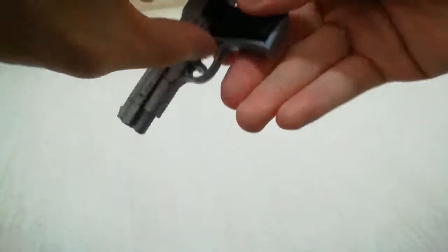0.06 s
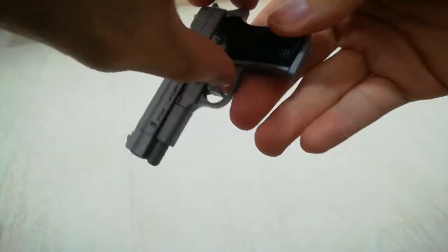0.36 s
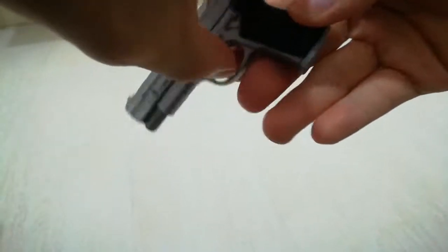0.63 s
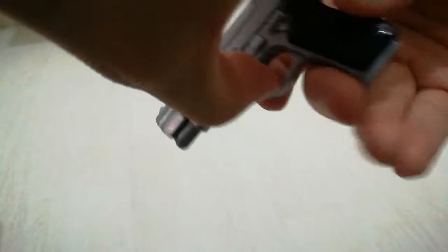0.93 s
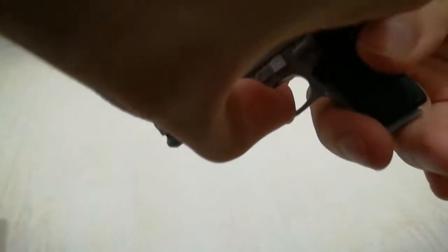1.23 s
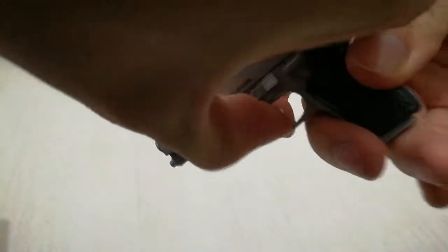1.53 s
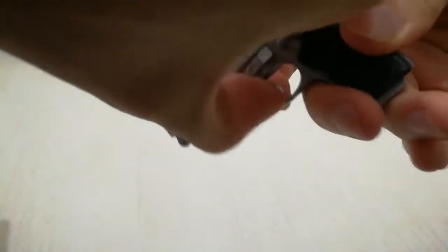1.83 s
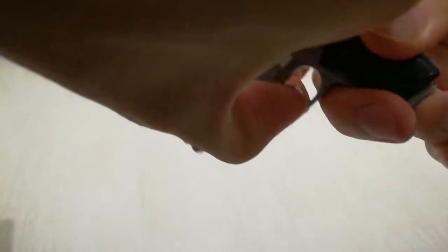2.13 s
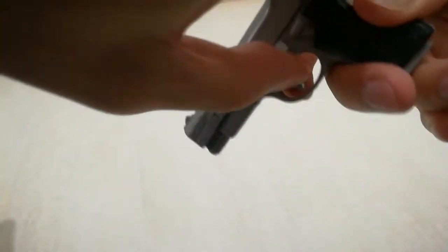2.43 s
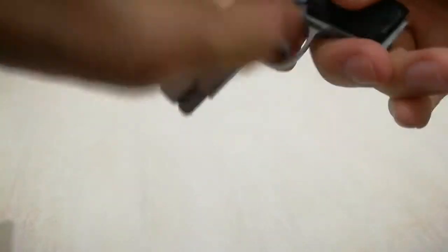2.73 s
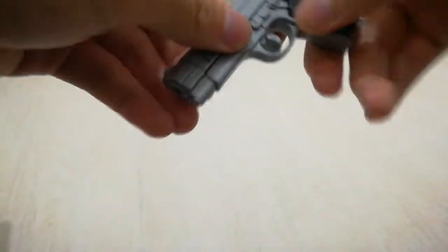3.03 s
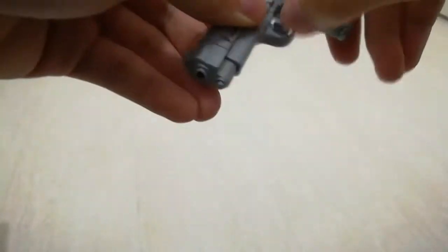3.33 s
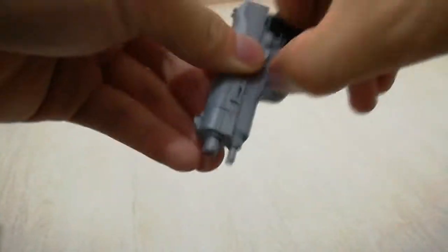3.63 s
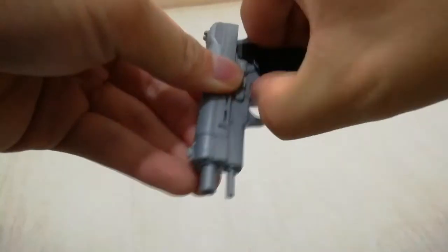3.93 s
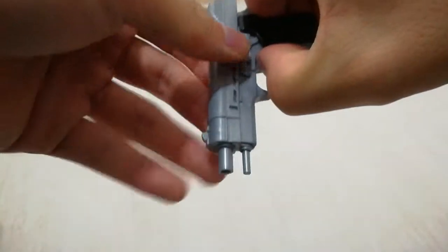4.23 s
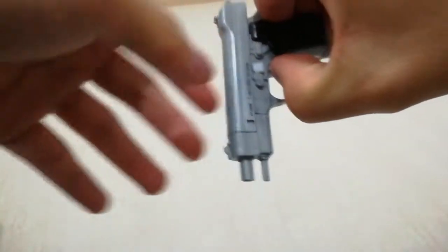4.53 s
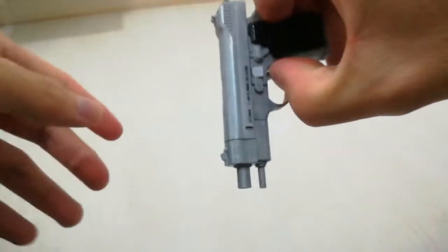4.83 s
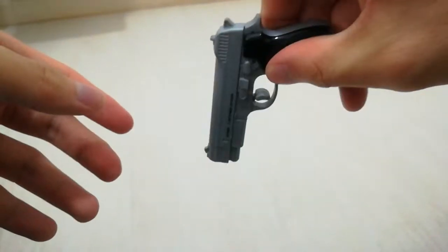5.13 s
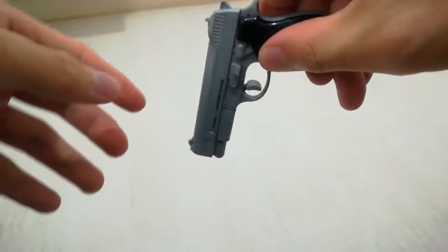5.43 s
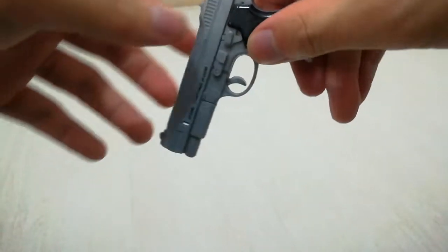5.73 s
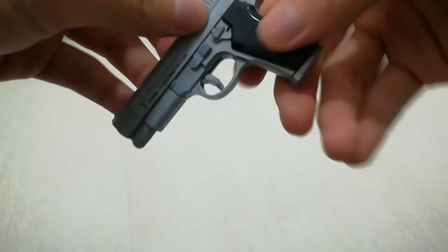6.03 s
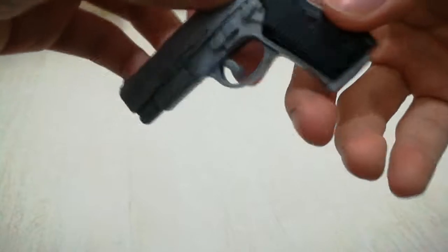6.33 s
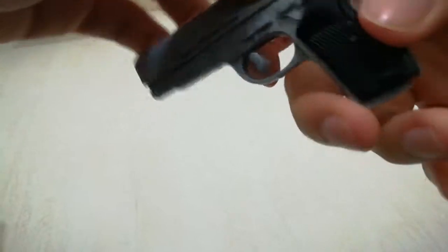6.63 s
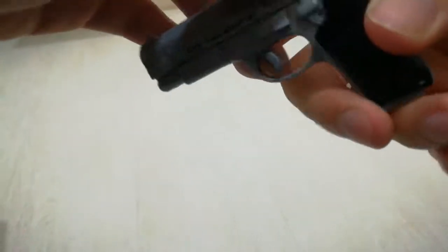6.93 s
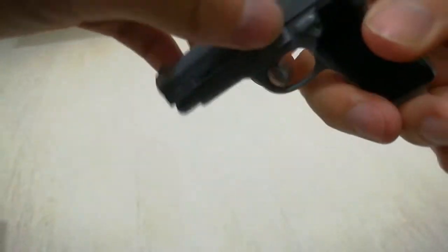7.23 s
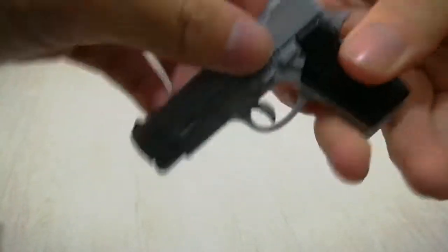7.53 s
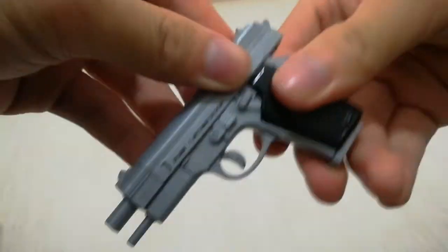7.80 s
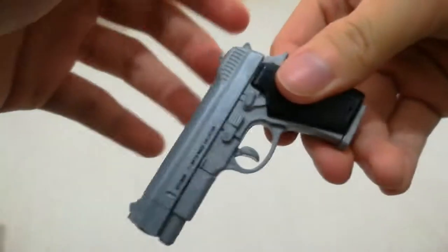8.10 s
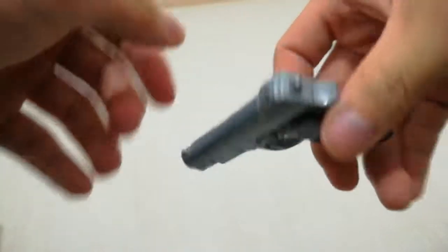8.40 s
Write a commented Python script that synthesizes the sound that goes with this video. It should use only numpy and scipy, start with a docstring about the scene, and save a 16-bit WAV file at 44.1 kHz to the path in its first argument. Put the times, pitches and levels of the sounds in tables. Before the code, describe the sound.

A small metal toy pistol is handled close to the microphone in a quiet, bare room. Loose parts tick and scrape faintly, then the magazine clicks home with a spring ping and soft thuds. The slide snaps shut with a very loud, briefly ringing crack. More light clicks follow, then a short rasp as the slide is drawn back and a second sharp snap. A faint low rumble lies underneath.

```python
"""A quiet, bare room, where hands work a small die-cast toy pistol close to the left microphone.
Loose parts tick, the magazine is pushed home with a spring ping and soft thuds, and the slide is
drawn back with a rasp and twice snaps shut, hard enough to overload the microphone. Clicks and
rasp all ring the same hand-damped casting; short reflections and a low rumble sit behind them."""
import sys
import numpy as np
from scipy import signal
from scipy.fft import rfft, irfft, next_fast_len
from scipy.io import wavfile
from scipy.ndimage import uniform_filter1d, minimum_filter1d

SR = 44100
rng = np.random.default_rng(int(sys.argv[2]) if len(sys.argv) > 2 else 0)


def file_out(sig):
    """Save sig as 16-bit WAV at sys.argv[1]."""
    # one column per channel
    cols = np.atleast_2d(sig).T
    # limit, then scale
    lim = np.clip(cols, -1, 1)
    pcm = np.round(lim * 32767).astype(np.int16)
    wavfile.write(sys.argv[1], SR, pcm)


N = 373067
TIME = np.arange(N) / SR
CUTOFF_HZ = 16000

# The slide snaps shut. Each row: start in seconds, level in dB, low ring in dB, room send in dB,
# rebound gap in seconds, loss per rebound in dB, slide ring in dB, overload bark in dB.
SLAMS = [(4.9252, 1, -0.5, -6, .0064, 8.5, -30, -34.5), (7.916, -6.5, 0, -11, .0052, 13.5, -43.5, -48)]
def slam_blows(centre_hz=5650, edge_db=5, catch_lead_s=.004, catch_db=-19.5):
    """The slide clips the catch, lands hard and rebounds; returns blows for metal_clicks."""
    blows = []
    for s, db, low_db, room_db, gap_s, loss_db, _, _ in SLAMS:
        hits = [(s - catch_lead_s, catch_db)] + bounces(s, db, gap_s, loss_db)
        blows += [(*hit, centre_hz, low_db, edge_db, room_db) for hit in hits]
    return blows


# The slide's bright ring, and the short low bark of the overloaded microphone on each snap.
# Each row: pitch in Hz, level in dB, seconds to fade by 60 dB.
SLIDE_MODES = [(2472, 0.5, .28), (2770, -2, .26), (3170, -5.5, .2), (4000, -3, .2), (4835, 0, .36),
               (5100, -1.5, .42), (5400, 0.5, 0.39), (6060, -1.5, .4)]
OVERLOAD_MODES = [(563, -0.5, 0.019), (1530, 5, .016)]
def slam_ring():
    """Each slam leaves the slide ringing; two fast-dying tones imitate the microphone's overload bark."""
    slide = struck([(s, ring_db) for s, *_, ring_db, _ in SLAMS], SLIDE_MODES)
    bark = struck([(s, bark_db) for s, *_, bark_db in SLAMS], OVERLOAD_MODES)
    return slide + bark


# Metal meets metal. Each row: start in seconds, level in dB, ring centre in Hz, low ring in dB,
# bright edge in dB, room send in dB, first bounce gap in seconds (no bounce below 1 ms).
CONTACTS = [(0.877, -58.5, 5300, 14, -6, -6, 0), (0.9783, -43.5, 5600, 5.5, -2, 3.5, 0.00013),
            (1.5405, -56.5, 5000, -16, -1, -2, 0.0012), (1.5874, -42.5, 5110, -9.5, -9.5, 2, .006),
            (2.0432, -59.5, 5240, 4, -3.5, -13, 0), (2.2713, -51, 4990, 6, -10, -1, .006),
            (2.5932, -51.5, 5140, 2, -23, -10, 0), (2.8275, -43, 6050, -1.5, -3.5, -4, .018),
            (2.918, -44, 5750, -15, -2, -6, .012), (3.1013, -45.5, 5800, -15.5, -20, -2.5, 0.000099),
            (3.2223, -49.5, 6240, -15, 6.5, -12, 0.00032), (3.2443, -48.5, 6200, 4, -2.5, -4, 0.00077),
            (3.3144, -48.5, 5600, 11.5, 4, -7, .035), (3.5599, -35, 5260, -17, -19, -18.5, .006),
            (3.8164, -39.5, 4830, -3, 1, -5.5, 0.00055), (3.849, -33, 5290, -17.5, -4, -3, 0.0013),
            (3.852, -19, 5450, -25, -4, -11, 0.00088), (3.8825, -33, 5100, -5, 3, -8.5, 0),
            (3.892, -32.5, 4920, -1, 1.5, -2, .004), (4.0418, -38, 5200, -6, -5.5, -8, 0.00057),
            (4.119, -50.5, 5360, 1, -6, 3.5, 0), (4.149, -25.5, 4850, -4.5, -1, -4.5, 0.000035),
            (4.374, -40, 4995, 7, -6.5, -1, 0), (5.773, -46, 5450, 2.5, -21, -5, .0033),
            (5.8144, -42, 5355, 9.5, -21, -7, 0.00082), (6.198, -58.5, 5080, 5, 2, -9, 0.00092),
            (6.882, -55, 5570, 12.5, -21, -2.5, 0.00057), (7.003, -42.5, 5260, 11, -5.5, -10, 0),
            (7.012, -46.5, 5380, 14.5, 2, -2, 0), (7.061, -48, 5400, 11, 7, 3, 0),
            (7.0818, -52.5, 4460, 20.5, -14, 0.5, 0), (7.1226, -51, 5130, 20, -7, -3, .0074),
            (7.161, -38.5, 4600, 1.5, -11, -4.5, 0), (7.1907, -37.5, 5560, 5, -10, -2, 0),
            (7.1941, -35.5, 5300, 7.5, -9.5, -11, 0), (7.5408, -54.5, 4400, -5, -7.5, -4.5, 0),
            (7.6824, -29.5, 5470, -7, -3.5, -8, 0.000066), (7.708, -30.5, 5670, 4.5, -0.5, -5.5, 0),
            (7.8842, -47, 4960, 1.5, -21, -20.5, 0.00048), (8.351, -53, 4940, 23, -16, -2.5, 0.00047)]
def handling_blows(loss_db=7):
    """Parts meet and bounce as the hands work the pistol; returns blows for metal_clicks."""
    blows = []
    for s, db, *colour, gap_s in CONTACTS:
        blows += [(*hit, *colour) for hit in bounces(s, db, gap_s, loss_db)]
    return blows


def loose_blows(per_s=1.0, db=-63.5, centre_hz=4997, low_db=3.5, edge_db=-5.5, room_db=-4.0):
    """Loose parts tick faintly at random all through the handling."""
    starts = rng.uniform(0, TIME[-1], round(per_s * N / SR))
    return [(s, db, centre_hz, low_db, edge_db, room_db) for s in starts]


def bounces(s, db, gap_s, loss_db, shrink=.7, count=3):
    """A blow and its rebounds, ever weaker and closer together, as pairs of seconds and dB."""
    if gap_s < .001:
        return [(s, db)]
    starts = s + gap_s * np.append(0, np.cumsum(shrink ** np.arange(count - 1)))
    return list(zip(starts, db - loss_db * np.arange(count)))


# A light touch rings narrowly, a hard blow broadly.
# Each row: blow level in dB, lift of the favoured band in dB.
FOCUS_BY_LEVEL = [(-43, 11), (-42, 9), (-33, 4)]
def metal_clicks(modes, blows, scatter=.87, seat_s=.0011, attack_samples=110):
    """Each blow rings its own mix of the casting's modes; returns the stereo clicks and a room send."""
    direct, send = np.zeros((2, N)), np.zeros(N)
    seating = 1 - np.exp(-(TIME[:modes.shape[1]] + 1 / SR) / seat_s)   # faces take an instant to close
    for s, db, centre_hz, low_db, edge_db, room_db in blows:
        strengths = rng.choice([-1, 1], len(modes)) + scatter * rng.standard_normal((2, len(modes)))
        # the room gathers all directions, so single modes even out: it gets a plain impulse
        rings = np.vstack([strengths @ modes * seating, signal.unit_impulse(len(seating))])
        focus_db = np.interp(db, *np.transpose(FOCUS_BY_LEVEL))
        rings = coloured(rings, lambda hz: contact_colour(hz, centre_hz, focus_db, low_db, edge_db))
        rings *= from_db(db) / rings[:, :attack_samples].std(axis=1, keepdims=True)
        add(direct, s, rings[:2])
        add(send, s, rings[2] * from_db(room_db))
    return direct, send


def casting_modes(count=140, samples=1100, t60_s=.0091):
    """Crowded modes of slide and frame, damped by the hand within milliseconds; one row each."""
    hz = (np.arange(count) + rng.random(count)) * CUTOFF_HZ / count
    t = TIME[:samples]
    return np.cos(2 * np.pi * hz[:, None] * t) * from_db(-60 * t / t60_s)


# The casting's basic tone. Each row: frequency in Hz, relative level in dB.
CASTING_TONE = [(100, -50.5), (600, -36), (1200, -26), (1900, -16), (2700, -12.5), (3600, -6.5),
                (4300, -2.5), (4800, -5.5), (5500, -3), (6500, -5.5), (7800, -11), (10000, -16.5),
                (12000, -26.5), (16000, -33.5)]
def contact_colour(hz, centre_hz, focus_db, low_db, edge_db, focus_octaves=.19):
    """A contact's EQ in dB: one band is favoured, heavy parts add low ring, hard corners add edge."""
    octaves_away = np.log2(np.maximum(hz, 1) / centre_hz)
    focus = np.exp(-.5 * (octaves_away / focus_octaves) ** 2)
    low = at_hz([(500, .2), (2000, .92), (3000, .82), (4000, .15)], hz)
    edge = at_hz([(6600, .033), (8500, .69), (14000, 1.6)], hz)
    return at_hz(CASTING_TONE, hz) + focus_db * (focus - .5) + low_db * low + edge_db * edge


# Metal slides on metal. Each row: peak time in seconds, rise in seconds, fall in seconds, peak in dB.
STROKES = [(.11, .04, 0.08, -65.5), (.398, .03, 0.033, -60), (2.195, .04, .06, -62.5),
           (2.4, .06, 0.025, -68), (2.535, .04, .02, -58.5), (2.595, .025, 0.11, -63.5),
           (3.24, .04, .12, -62.5), (3.572, .048, 0.041, -38.5), (6.417, .01, 0.017, -62),
           (6.5, .04, .08, -67), (7.69, .062, .035, -40), (7.701, .01, 0.015, -35), (7.91, .008, .03, -27),
           (8.294, .02, .03, -68.5)]
def sliding_rasp(modes, slips_per_s=1800, uneven_db=4.0, centre_hz=5200, firm_db=-40.5):
    """Tiny stick-slip catches ring the casting; firm pressure opens a narrow whisper into a broad rasp."""
    catches = rng.random(N) < slips_per_s / SR
    slips = catches * from_db(uneven_db * rng.standard_normal(N)) * rng.choice([-1, 1], N)
    rasp = signal.fftconvolve(slips, rng.choice([-1, 1], len(modes)) @ modes)[:N]
    light = coloured(rasp, lambda hz: contact_colour(hz, centre_hz, focus_db=6.5, low_db=9.5, edge_db=-10))
    firm = coloured(rasp, lambda hz: contact_colour(hz, centre_hz, focus_db=5.5, low_db=-8.5, edge_db=-.5))
    friction = sum(stroke_friction(*stroke) for stroke in STROKES)
    pressure = np.minimum(friction / from_db(firm_db), 1)
    return friction * ((1 - pressure) * rms_one(light) + pressure * rms_one(firm))


def stroke_friction(peak_s, rise_s, fall_s, peak_db, graze_db=-71.5):
    """Friction swells from a graze to its peak and eases off again, in a rounded arch."""
    phase = np.interp(TIME, [peak_s - rise_s, peak_s, peak_s + fall_s], [-1, 0, 1])
    arch = np.cos(phase * np.pi / 2)
    return from_db(graze_db + (peak_db - graze_db) * arch) * (abs(phase) < 1)


# Hits on the magazine spring. Each row: start in seconds, level in dB.
TWANGS = [(3.853, -33), (3.894, -53)]
# The spring's ping. Each row: pitch in Hz, level in dB, seconds to fade by 60 dB.
SPRING_MODES = [(3910, -12, 0.28), (4560, -7, 0.17), (5000, -9.5, 0.31), (5680, -7.5, 0.24),
                (6720, -1, .14), (7300, -8, .2)]
def spring_ping():
    """The spring twangs as the magazine is pushed home."""
    return struck(TWANGS, SPRING_MODES)


# Small clinks. Each row: start in seconds, level in dB, pitch in Hz.
CLINKS = [(.98, -49.5, 3700), (.981, -56, 3030), (1.655, -48, 2200), (2.504, -47.5, 4800),
          (2.513, -43.5, 4744), (3.102, -58, 2980), (3.129, -55.5, 2940), (3.577, -44.5, 8840),
          (4.376, -46.5, 3336), (4.397, -53, 2010), (5.774, -48.5, 1810), (5.814, -47, 5320),
          (7.193, -43, 6400)]
# One clink's ring. Each row: multiple of its pitch, level in dB, seconds to fade by 60 dB.
CLINK_MODES = [(0.889, -16.5, 0.23), (1, 1.5, 0.026), (1.13, -8.5, .025)]
def part_clinks():
    """Small parts ring on after a hit, each at its own pitch."""
    out = np.zeros(N)
    for s, db, hz in CLINKS:
        modes = [(hz * ratio, mode_db, t60_s) for ratio, mode_db, t60_s in CLINK_MODES]
        out += struck([(s, db)], modes)
    return out


# Three palm thuds, then one overload thump. Each row: start in seconds, level in dB.
THUDS = [(3.8162, -46), (3.8495, -41.5), (3.8915, -43), (4.926, -49)]
# The dull body they share. Each row: pitch in Hz, level in dB, seconds to fade by 60 dB.
THUD_MODES = [(62, -0.5, 0.18), (127, 3, 0.069), (194, 0.5, 0.076), (318.3, -3, 0.046),
              (666.4, -17.5, 0.09)]
def low_thuds():
    """The palm drives the magazine in; the same tones imitate the loudest snap's overload thump."""
    return -struck(THUDS, THUD_MODES)


# Fingertip clicks. Each row: start in seconds, relative level in dB.
FINGER_TICKS = [(1.1167, -26), (1.1564, -30.5)]
def finger_ticks(band_hz=(150, 3800), gain_db=7.5, left_db=-27.0):
    """A fingertip clicks beside the right microphone: dry single pulses with no ring."""
    pulses = np.full(N, 1e-18)   # a tiny floor keeps the filter from underflowing
    for s, db in FINGER_TICKS:
        add(pulses, s, -from_db([db + gain_db]))
    ticks = signal.sosfilt(signal.butter(2, band_hz, "band", fs=SR, output="sos"), pulses)
    return ticks * from_db([[left_db], [0]])


# The tone of the reflections. Each row: frequency in Hz, gain in dB.
WALL_TONE = [(200, -9), (700, -7), (1400, 1.5), (2500, 2), (3600, -2), (4800, -1.5), (6200, -1), (9000, -5),
             (15000, -1.5)]
# The length of the tail. Each row: frequency in Hz, seconds to fade by 60 dB.
ROOM_DECAY = [(300, .35), (2000, 0.51), (5500, .41), (9000, 0.48), (15000, 0.36)]
def room(send, build_s=.0016, early_db=5.5, early_s=.012, bands=12):
    """Dense reflections: strong early ones from table and hands, then a short tail, fading by band."""
    t = TIME[:SR // 2]
    white = rfft(rng.standard_normal((2, len(t))))
    hz = np.arange(len(t) // 2 + 1) * SR / len(t)
    edges, tail = np.linspace(0, SR / 2, bands + 1), 0
    for low, high in zip(edges, edges[1:]):
        band = irfft(white * ((hz >= low) & (hz < high)), len(t))
        tail = tail + band * from_db(-60 * t / at_hz(ROOM_DECAY, (low + high) / 2))
    build_up = 1 - np.exp(-(t / build_s) ** 2)
    early_lift = from_db(early_db * np.exp(-t / early_s))
    tail = rms_one(tail * build_up * early_lift) / np.sqrt(len(t))
    response = coloured(tail, lambda hz: at_hz(WALL_TONE, hz))
    return signal.fftconvolve(send[None], response, axes=1)[:, :N]


# The room tone. Each row: frequency in Hz, relative level in dB.
AIR_TONE = [(12, -33), (20, 1.5), (55, 0), (77, -8.5), (107, -1.5), (138, -15), (182, -7), (228, -16.5),
            (277, -15.5), (624, -27.5), (1440, -24.5), (2260, -31), (5080, -31.5), (6360, -33),
            (16000, -34)]
# Its stereo width. Each row: frequency in Hz, left-right correlation.
AIR_LIKENESS = [(60, 0.97), (130, 1), (290, -0.33), (640, -.45), (1400, 0.32), (3100, -0.42),
                (15000, -0.099)]
# Its gentle swell. Each row: time in seconds, gain in dB.
AIR_SWELL = [(0, 2), (1, 2), (2.3, 3), (3.2, 2), (4.5, 2.5), (5.5, -0.5), (6.7, 0), (7.4, 0.5), (8.46, -3)]
def still_air(level_db=-64.0):
    """Low room rumble shared by both microphones, and their own hiss."""
    size = next_fast_len(N, True)
    mid, side = rfft(rng.standard_normal((2, size)))
    hz = np.arange(len(mid)) * SR / size
    alike = np.clip(at_hz(AIR_LIKENESS, hz), -.9, .99)
    width = np.sqrt((1 - alike) / (1 + alike))
    spectrum = (mid + width * side * [[1], [-1]]) * from_db(at_hz(AIR_TONE, hz))
    swell_db = np.interp(TIME, *np.transpose(AIR_SWELL))
    return rms_one(irfft(spectrum, size)[:, :N]) * from_db(level_db + swell_db)


def struck(hits, modes):
    """Every hit sets the same few decaying sines ringing."""
    t, out = TIME[:SR // 2], np.zeros(N)
    ring = sum(from_db(db - 60 * t / t60_s) * np.sin(2 * np.pi * hz * t) for hz, db, t60_s in modes)
    for s, db in hits:
        add(out, s, from_db(db) * ring)
    return out


def coloured(x, db_at):
    """Causal (minimum-phase) filter whose gain in dB is db_at(Hz)."""
    size = 2 * next_fast_len(x.shape[-1])
    hz = np.arange(size // 2 + 1) * SR / size
    cepstrum = irfft(np.log(from_db(db_at(hz))))
    cepstrum[1:size // 2] *= 2
    cepstrum[size // 2 + 1:] = 0
    return irfft(rfft(x, size) * np.exp(rfft(cepstrum)))[..., :x.shape[-1]]


def at_hz(points, hz):
    """Read a table on a log-frequency axis."""
    f, value = np.transpose(points)
    return np.interp(np.log(np.maximum(hz, 1)), np.log(f), value)


def add(out, s, x):
    """Mix x into out from s seconds on."""
    i = round(s * SR)
    out[..., i:i + x.shape[-1]] += x[..., :N - i]


def from_db(db):
    return 10 ** (np.asarray(db) / 20)


def rms_one(x):
    return x / np.sqrt(np.mean(x ** 2) + 1e-20)


# The right microphone faces away. Each row: frequency in Hz, gain against the left in dB.
RIGHT_SHADOW = [(100, 3.5), (400, 1.5), (1300, -11), (2500, -8), (4400, -17), (6500, -18.5), (8000, -12.5),
                (10000, -4.5), (15000, -1.5)]
def scene(rasp_room_db=-8.5, ring_room_db=-6.5, right_lag_s=.00059):
    """The pistol's metal and its reflections reach the right microphone later and duller."""
    modes = casting_modes()
    clicks, click_send = metal_clicks(modes, handling_blows() + slam_blows() + loose_blows())
    rasp = sliding_rasp(modes)
    ring = slam_ring() + spring_ping() + part_clinks()
    send = click_send + from_db(rasp_room_db) * rasp + from_db(ring_room_db) * ring
    left, right = clicks + rasp + ring + room(send)
    delayed = np.interp(TIME - right_lag_s, TIME, right)
    right = coloured(delayed, lambda hz: at_hz(RIGHT_SHADOW, hz))
    return np.array([left, right]) + low_thuds() + finger_ticks() + still_air()


def noise_suppressor(x, depth_db=4.5, threshold_db=5.0, span_db=10.0, frame_samples=512):
    """Bands near their median level are turned down, so tails end early."""
    _, _, frames = signal.stft(x, nperseg=frame_samples)
    power = uniform_filter1d(abs(frames) ** 2, size=7, axis=1)   # smooth over frequency
    power = uniform_filter1d(power, size=3, axis=2)   # and over time
    level_db = 10 * np.log10(np.maximum(power, 1e-20))
    above_db = level_db - np.median(level_db, axis=2, keepdims=True)
    opening = np.clip((above_db - threshold_db) / span_db, 0, 1)
    return signal.istft(frames * from_db(depth_db * (opening - 1)), nperseg=frame_samples)[1][:, :N]


def record(dry, bass_cut_hz=28.0, limit=2.0, ceiling=1.0, limiter_samples=31):
    """Deep bass and hiss are turned down; the loudest snaps hit a fast limiter and clip; the top is cut."""
    bass_cut = signal.butter(2, bass_cut_hz, "high", fs=SR, output="sos")
    top_cut = signal.ellip(10, .1, 80, CUTOFF_HZ, fs=SR, output="sos")
    x = noise_suppressor(signal.sosfilt(bass_cut, dry))
    needed_gain = limit / np.maximum(abs(x), limit)
    gain = uniform_filter1d(minimum_filter1d(needed_gain, limiter_samples), limiter_samples)
    return signal.sosfilt(top_cut, np.clip(x * gain, -ceiling, ceiling))


dry = scene()
out = record(dry)
file_out(out)
```